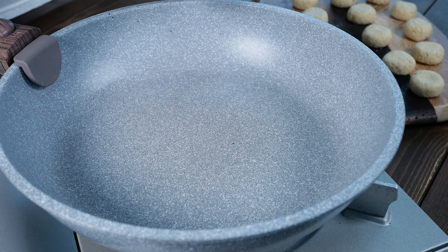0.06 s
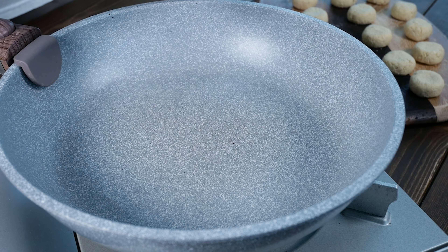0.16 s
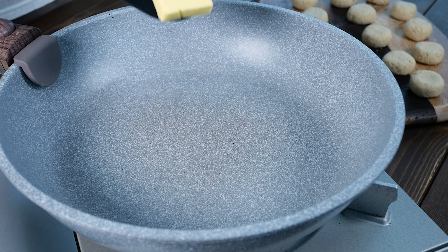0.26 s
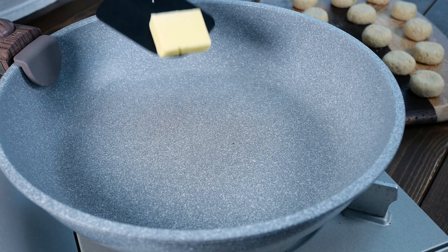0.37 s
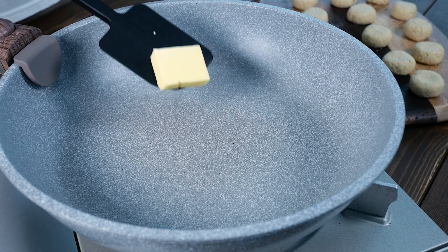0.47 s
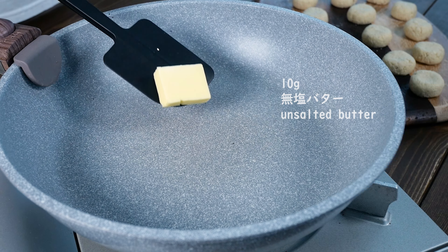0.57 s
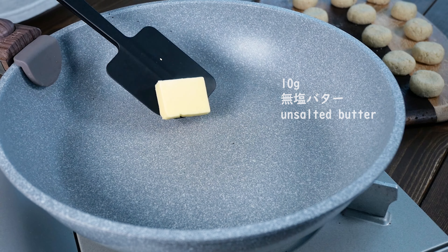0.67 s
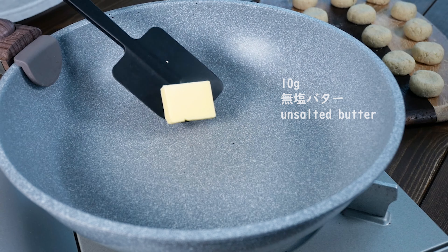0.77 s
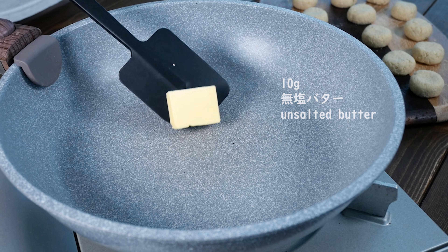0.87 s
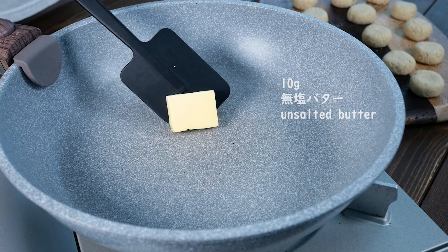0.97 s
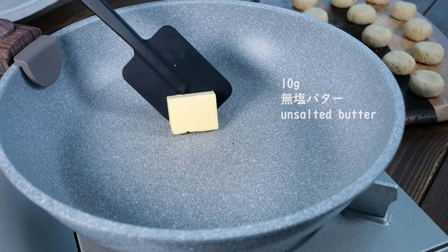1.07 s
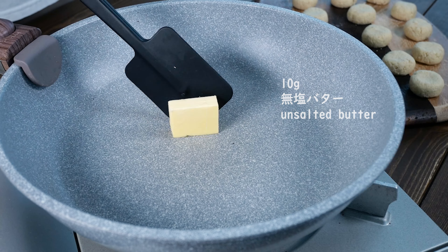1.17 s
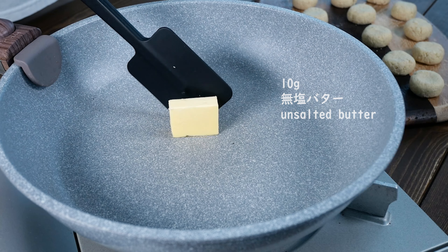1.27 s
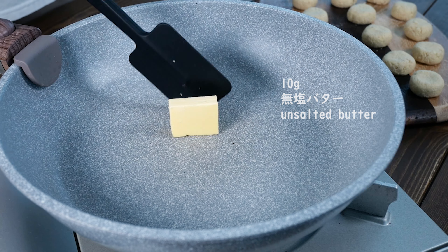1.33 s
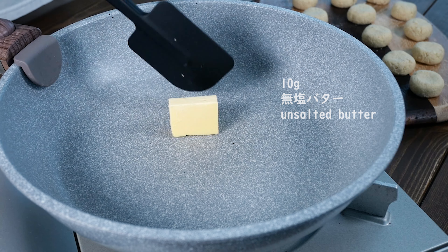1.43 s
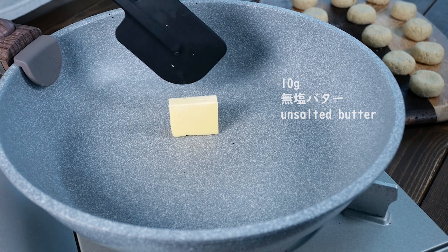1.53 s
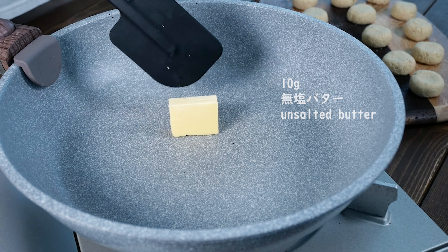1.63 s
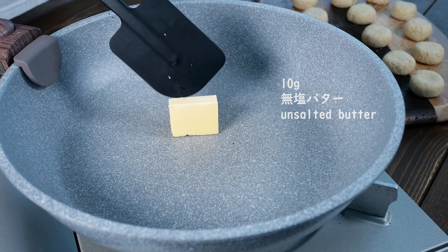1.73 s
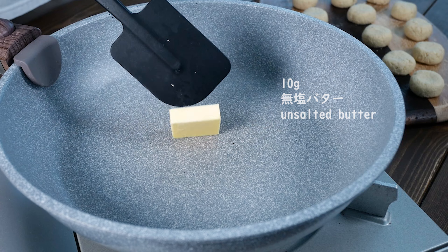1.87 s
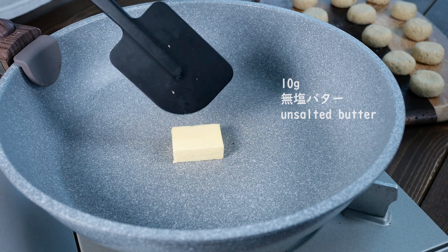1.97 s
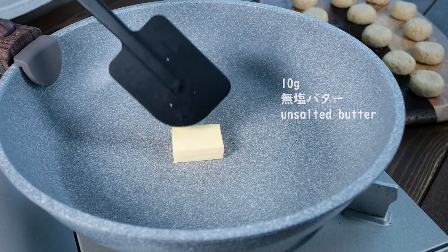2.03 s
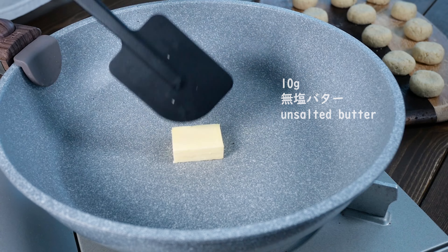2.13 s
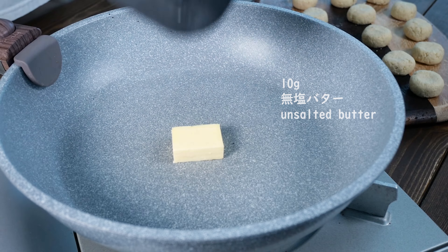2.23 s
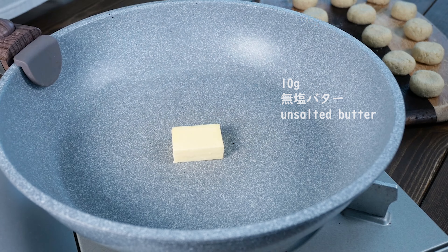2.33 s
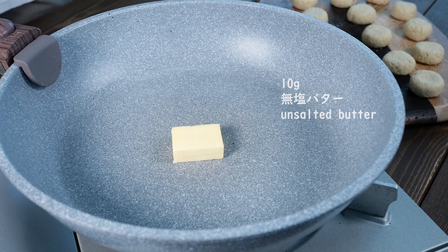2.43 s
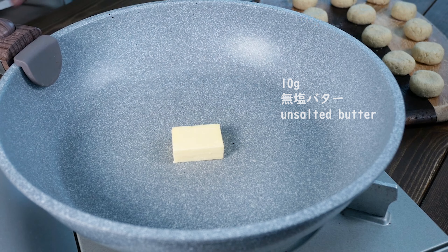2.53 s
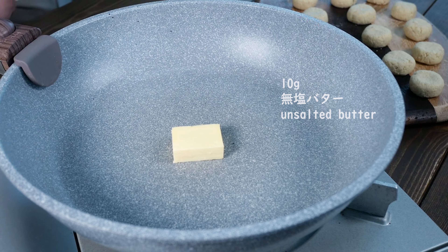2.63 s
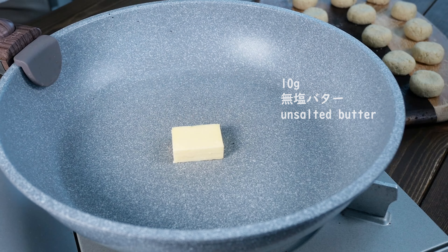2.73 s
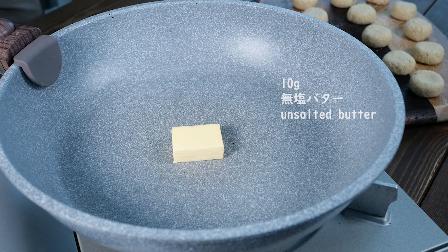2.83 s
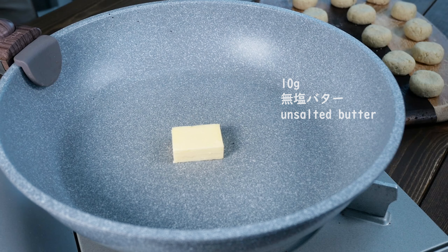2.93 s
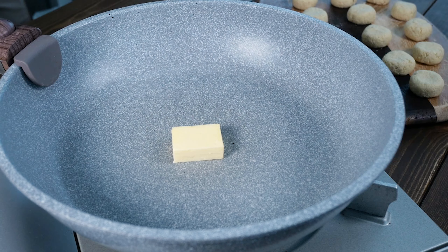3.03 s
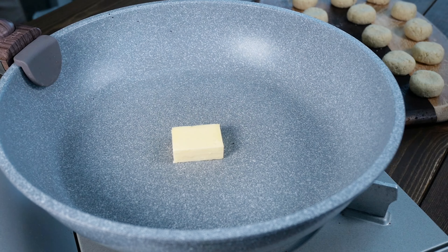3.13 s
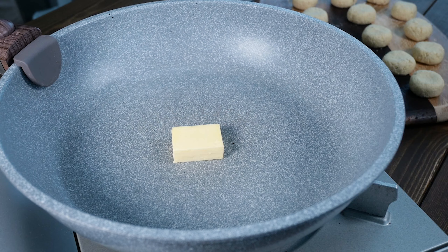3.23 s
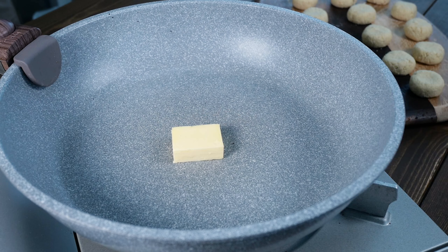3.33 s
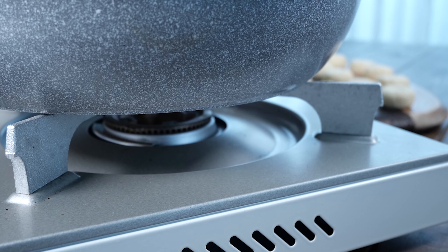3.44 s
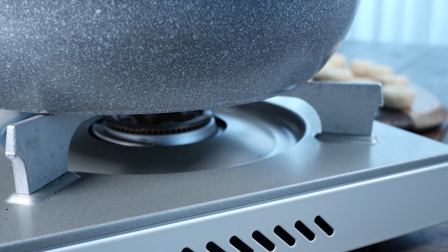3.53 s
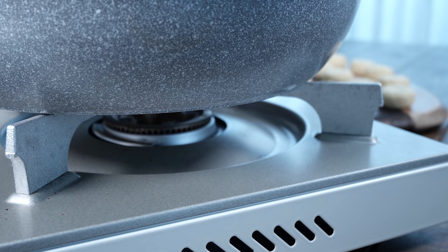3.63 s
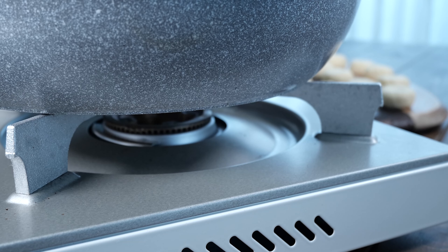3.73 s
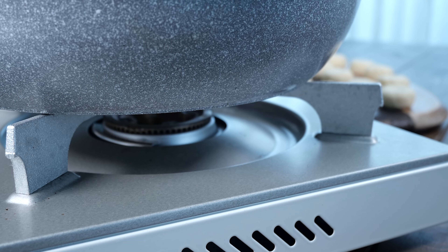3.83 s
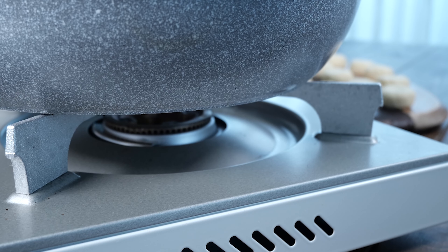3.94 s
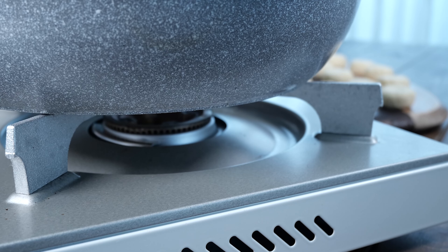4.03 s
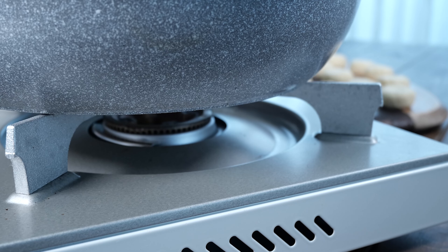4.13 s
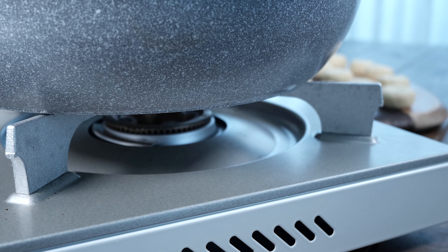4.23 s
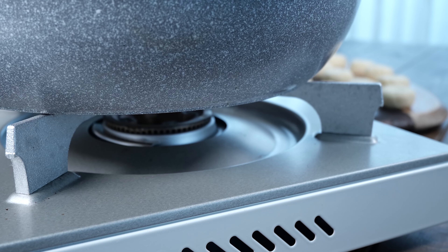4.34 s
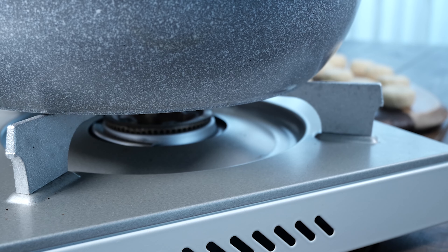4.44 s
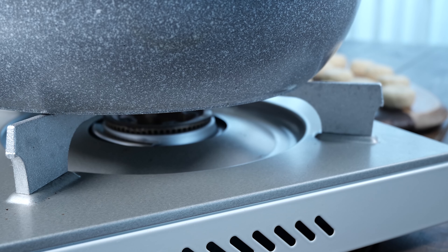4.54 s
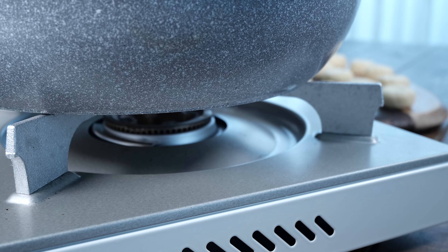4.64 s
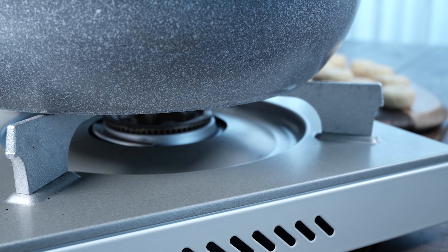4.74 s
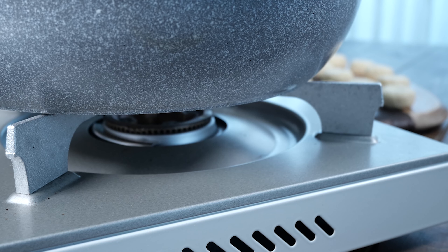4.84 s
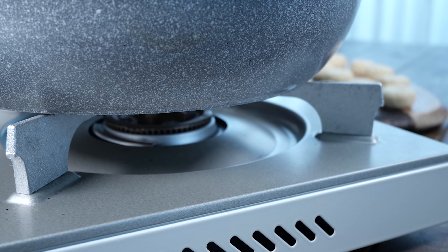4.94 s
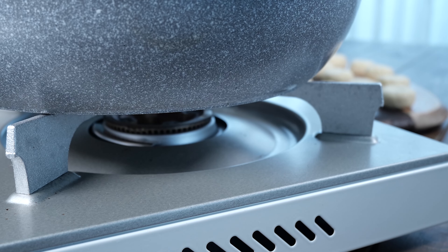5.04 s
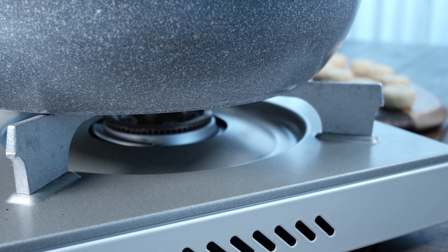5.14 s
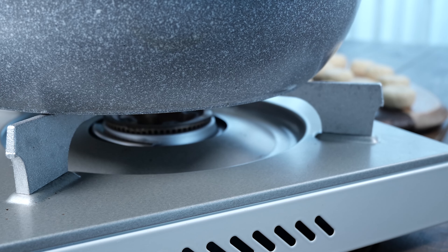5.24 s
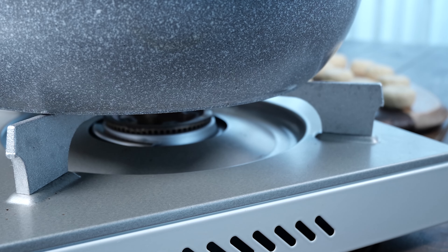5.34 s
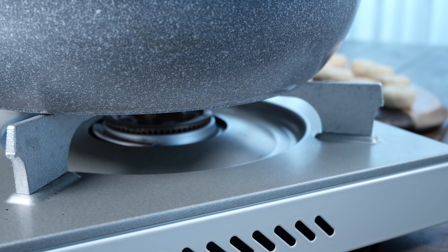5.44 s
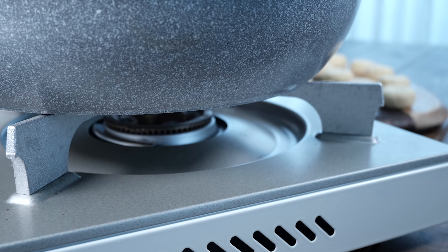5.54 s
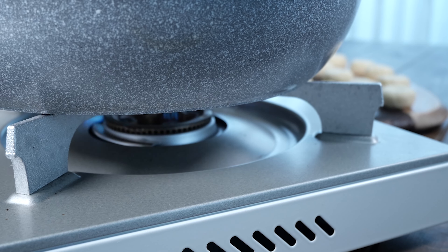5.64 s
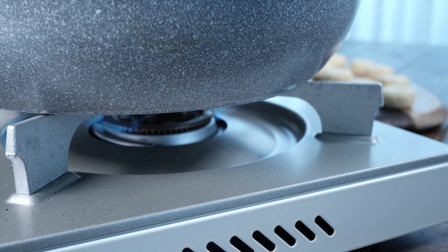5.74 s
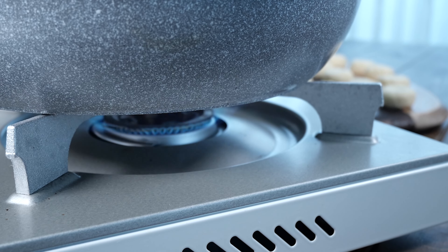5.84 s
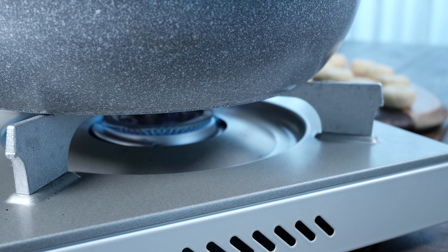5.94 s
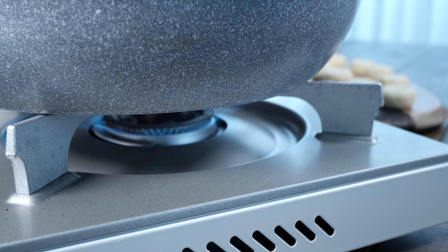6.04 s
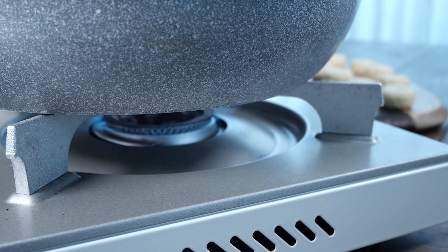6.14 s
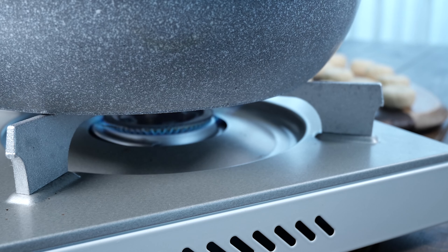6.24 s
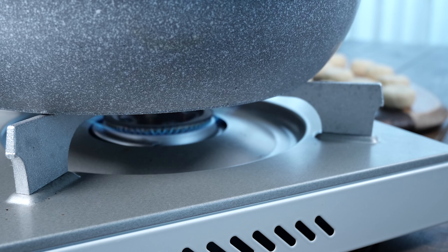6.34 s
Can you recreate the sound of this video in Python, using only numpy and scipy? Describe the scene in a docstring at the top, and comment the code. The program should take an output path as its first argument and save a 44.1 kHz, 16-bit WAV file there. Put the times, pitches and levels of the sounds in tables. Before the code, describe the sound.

A spatula strikes a pan once before a portable gas stove's knob clunks, gas hisses, the igniter snaps and the flame catches.

```python
"""A quiet kitchen, close to a portable gas stove. A pat of butter is set in the frying pan and the
spatula knocks the pan once, ringing its metal. The knob is gripped and turned: the linkage clunks
through the sheet-steel case, the gas jet starts to hiss and the piezo igniter snaps. The gas catches
under the pan with a low puff and a few fluttering flares, then settles to a soft roar."""
import sys
import numpy as np
from scipy import signal
from scipy.fft import rfft, irfft
from scipy.io import wavfile

SR = 44100
rng = np.random.default_rng(int(sys.argv[2]) if len(sys.argv) > 2 else 0)


def pcm_store(signal):
    """Save signal as 16-bit PCM."""
    levels = np.round(np.clip(np.atleast_2d(signal), -1, 1) * 32767)
    wavfile.write(sys.argv[1], SR, levels.astype(np.int16).T)


N = 282240
TIME = np.arange(N) / SR

# noise colours: freq_hz, relative_db (per Hz)
ROOM_TONE_COLOUR = [(20, -19), (60, -15.5), (120, -13.5), (225, -4), (300, -6), (550, -8), (850, -6),
                    (1150, -12), (1600, -19), (2600, -26.5), (4000, -29), (7500, -31), (15500, -35)]  # the still kitchen
CLOTH_COLOUR = [(1200, 2), (2500, -1.5), (7000, -3), (15000, -11.5)]  # a brushing sleeve
JET_COLOUR = [(30, -26), (150, 0), (500, 0), (900, -0.5), (1500, -3.5), (2400, -6), (4200, -10.5),
              (5000, -8), (7000, -10.5), (8800, -14), (10800, -17.5), (12400, -25), (13700, -17),
              (15800, -24)]  # the hiss of the gas jet
ROAR_COLOUR = [(25, -44), (60, -21.5), (130, -7.5), (220, -5.5), (360, -3.5), (520, -1), (690, -29),
               (900, -20), (1060, -6.5), (1250, -43), (1450, -18), (1750, -29.5), (2800, -32), (6000, -59)]  # the steady flame under the pan
FLARE_COLOUR = [(40, -39), (150, -7.5), (380, 10.5), (520, 6), (720, -8.5), (1060, -3.5), (2200, -6.5),
                (3500, -13), (7000, -21.5), (15000, -33)]  # the brighter, flaring flame
# the kitchen's reverb time: freq_hz, t60_s
REVERB_DECAY = [(200, 0.55), (1000, 0.28), (3000, 0.38), (8000, 0.28), (15000, 0.4)]
# the reverb's level against its send: freq_hz, gain_db
REVERB_GAIN = [(200, -6.5), (1000, -5), (3000, -8), (8000, -11), (15000, -17.5)]
# a thin whine that comes and goes: start_s, end_s
WHINE_SPANS = [(0, 0.71), (1.78, 2.05)]
# one swell of the sleeve for each arm movement: peak_s, level_db, half_length_s
SLEEVE_STROKES = [(2.62, -65, 0.055), (3.08, -64, 0.23), (4.14, -60.5, 0.12)]
# light ticks of the utensil, and of fingers on the stove: start_s, level_db, centre_hz
TICKS = [(0.974, -58.5, 5300), (1.345, -70, 5000), (1.368, -62.5, 1880), (1.383, -65.5, 3620),
         (1.393, -66, 3820), (2.4408, -52, 4930), (3.857, -63, 4250)]
# butter, then spatula, landing on the pan: start_s, level_db, hardness_hz, ring_time_factor
PAN_KNOCKS = [(0.9756, -44, 477, 2.2), (1.076, -55, 430, 2.5), (2.0428, -12.5, 4070, 0.89)]
# the pan's modes, long rings first: pitch_hz, level_db, t60_s
PAN_MODES = [(361, -25, .5), (655, -16, .14), (1230, -18, .15), (1290, -9, .22), (2126, -36, .45),
             (2375, -31, .6), (2715, -28, .2), (3700, -31, .21), (280, -16, .06), (490, -21, .05),
             (618, 2, .045), (756, -11, .04), (921, -10, .04), (1180, -9, .035), (1500, -8, .035),
             (1295, 2, .045), (1658, -13, .04), (1950, -6, .025), (2200, -10, .03), (2690, -4, .03),
             (3000, -12, .022), (3720, -8, .04), (3980, -17, .025), (5378, -19, .04), (6153, -30, .07),
             (6589, -33, .07), (7350, -22, .05), (8500, -22, .04), (12800, -17, .04)]
# the stove's feet groan low, its stiff valve squeaks high:
# peak_s, pitch_hz, width_hz, level_db, half_length_s
RUBS = [(3.929, 880, 180, -48.5, 0.01), (4.028, 900, 220, -54, 0.03), (4.051, 890, 159, -44.5, .011),
        (5.07, 3120, 348, -50.5, 0.048), (5.104, 5400, 500, -47, 0.017)]
# knob, linkage and igniter hammer hitting the case: start_s, level_db, hardness_hz, rattle_decay_s
STOVE_KNOCKS = [(3.857, -40, 790, 0.027), (3.894, -48, 600, 0.031), (4.025, -45.5, 800, 0.027),
                (4.1583, -28, 1150, 0.012), (4.172, -31.5, 1110, 0.0029), (4.181, -35, 1050, 0.0082),
                (4.755, -37, 1180, 0.073), (4.786, -39.5, 11700, 0.016), (4.874, -39.5, 2020, 0.067),
                (5.1187, -30.5, 1360, 0.043), (5.224, -29.5, 1390, 0.015), (5.235, -39, 11200, 0.0083),
                (5.3095, -22.5, 7100, 0.0099), (5.3107, -20, 1110, 0.0033), (5.38, -32.5, 1630, 0.013),
                (5.479, -39.5, 800, .012), (5.5046, -10, 16600, 0.0012), (5.5063, -14.5, 4100, 0.002)]
# the sheet-steel case's modes: pitch_hz, level_db, t60_s
CASE_MODES = [(270, -22, .05), (490, -13, .05), (670, -3, .04), (767, -5, .045), (868, -4, .045),
              (1005, -5, .045), (1130, -8, .035), (1380, -5, .048), (1560, -9, .03), (1912, 0, .032),
              (2120, -7, .02), (2392, -3, .036), (2615, -5, .028), (2726, -5, .032), (3054, -1, .033),
              (3195, -3, .03), (3665, -1, .022), (3920, -4, .025), (4395, -3, .035), (4628, -2, .035),
              (4960, 2, .02), (5664, -3, .025), (7584, 5, .025), (7900, 2, .015), (8500, 1, .012),
              (9600, -5, .015), (12600, -5, .01), (13700, -3, .01), (15200, -2, .012)]
# resonances of the burner's mixing tube: pitch_hz, width_hz, level_db
TUBE_RESONANCES = [(3170, 150, -13), (4670, 260, -21.5), (8090, 180, -9.5), (8890, 850, -8.5),
                   (13700, 800, -12)]
# groups of burner ports catching: peak_s, level_db, half_length_s
FLARES = [(5.647, -31, 0.0079), (5.689, -34, 0.016), (5.719, -31.5, 0.018), (5.778, -35, 0.014),
          (5.86, -31, 0.0022), (5.873, -31, 0.022), (5.95, -38.5, 0.014), (6.054, -36, 0.0082),
          (6.174, -34, 0.012), (6.236, -39.5, 0.024)]


def from_db(db):
    """Decibels to gain."""
    return 10 ** (np.asarray(db) / 20)


def unit_rms(x):
    """Scale a signal to rms 1."""
    return x / np.sqrt(np.mean(x ** 2) + 1e-20)


def at_hz(points, hz):
    """Read a table on a log-frequency axis."""
    freqs, values = np.transpose(points)
    return np.interp(np.log(np.maximum(hz, 1)), np.log(freqs), values)


def band(x, hz, kind, order=2):
    """Causal Butterworth filter."""
    return signal.sosfilt(signal.butter(order, np.clip(hz, 10, .45 * SR), kind, fs=SR, output="sos"), x)


def noise(colour):
    """Steady noise of a given colour, rms 1."""
    gain = from_db(at_hz(colour, np.fft.rfftfreq(N, 1 / SR)))
    return unit_rms(irfft(rfft(rng.standard_normal(N)) * gain, N))


def narrow_noise(hz, width_hz):
    """Noise through one resonance, rms 1."""
    return unit_rms(band(rng.standard_normal(N), [hz - width_hz / 2, hz + width_hz / 2], "band"))


def burst(t, t60_s):
    """Noise that dies away: many small modes merged into a crack."""
    return rng.standard_normal(len(t)) * from_db(-60 * t / t60_s)


def ringing(modes, t):
    """A blow sets every mode ringing as a decaying sine."""
    hz, db, t60_s = np.transpose(modes)[:, :, None]
    polarity = (-1) ** np.arange(len(modes))[:, None]
    return np.sum(polarity * from_db(db - 60 * t / t60_s) * np.sin(2 * np.pi * hz * t), axis=0)


def swell(peak_s, level_db, half_length_s):
    """A bell-shaped envelope."""
    return from_db(level_db) * np.exp(-.5 * ((TIME - peak_s) / half_length_s) ** 2)


def fade_in(centre_s, rise_s):
    """A smooth step from silence to full gain."""
    return .5 + .5 * np.tanh(.5 * (TIME - centre_s) / rise_s)


def add_hit(out, start_s, level_db, hit):
    """Mix in a hit, scaled so that its energy, packed into 10 ms, has this level."""
    at = round(start_s * SR)
    gain = from_db(level_db) / np.sqrt(np.sum(hit ** 2) / (SR / 100))
    out[at:at + len(hit)] += gain * hit[:N - at]


def room_tone(bed_db=-57.5, whine_hz=7870, whine_db=-77, fade_s=.006):
    """The bed: a still kitchen, with a faint high whine that comes and goes."""
    gate = sum(fade_in(start_s, fade_s) - fade_in(end_s, fade_s) for start_s, end_s in WHINE_SPANS)
    whine = from_db(whine_db) * gate * np.sin(2 * np.pi * whine_hz * TIME)
    return from_db(bed_db) * noise(ROOM_TONE_COLOUR) + whine


def kitchen_reverb(send, first_wall_s=0.0049, build_s=0.0025):
    """A diffuse tail builds after the first wall's echo and hangs longest in the bass."""
    t, response = TIME[:SR * 3 // 4], 0
    edges_hz = np.geomspace(100, 18000, 14)
    onset = 1 - np.exp(-np.maximum(t - first_wall_s, 0) / build_s)
    for low, high in zip(edges_hz, edges_hz[1:]):
        hz = np.sqrt(low * high)
        decay = from_db(-60 * t / at_hz(REVERB_DECAY, hz))
        tail = band(rng.standard_normal(len(t)), [low, high], "band") * onset * decay
        unity_gain = np.sqrt(2 * (high - low) / SR / np.sum(tail ** 2))
        response = response + tail * unity_gain * from_db(at_hz(REVERB_GAIN, hz))
    return signal.fftconvolve(send, response)[:N]


def sleeve():
    """Cloth swishes softly with each movement of the arm."""
    return sum(swell(*stroke) for stroke in SLEEVE_STROKES) * noise(CLOTH_COLOUR)


def ticks(t60_s=0.024):
    """Utensil and fingers make tiny contacts, each a short band of noise."""
    out = np.zeros(N)
    for start_s, level_db, hz in TICKS:
        tick = band(burst(TIME[:SR // 10], t60_s), [hz / 1.45, hz * 1.47], "band")
        add_hit(out, start_s, level_db, tick)
    return out


def pan_knocks(crack_db=-12, crack_t60_s=.05, low_cut_hz=330):
    """A blow rings the pan; a soft contact leaves out the high modes and damps the ring less."""
    out, t = np.zeros(N), TIME[:SR]
    for start_s, level_db, hardness_hz, ring_time_factor in PAN_KNOCKS:
        ring = ringing(np.array(PAN_MODES) * [1, 1, ring_time_factor], t)
        crack = from_db(crack_db) * band(burst(t, crack_t60_s), 1500, "high")
        knock = band(ring + crack, hardness_hz, "low")
        add_hit(out, start_s, level_db, band(knock, low_cut_hz, "high"))  # a thin bowl has little bass
    return out


def stove_rubs():
    """Stick-slip of the feet and the valve: each rub swells and dies in one resonance."""
    return sum(swell(peak_s, level_db, half_length_s) * narrow_noise(pitch_hz, width_hz)
               for peak_s, pitch_hz, width_hz, level_db, half_length_s in RUBS)


def stove_knocks(crack_db=7, crack_t60_s=0.057, rattle_db=-15, rattles_per_s=2500, low_cut_hz=450):
    """Each clunk or snap is a blow and a short rattle of loose parts, sounding through the case."""
    out, t = np.zeros(N), TIME[:SR // 5]
    case_ring = ringing(CASE_MODES, t)
    crack_decay = from_db(-60 * t / crack_t60_s)
    for start_s, level_db, hardness_hz, rattle_decay_s in STOVE_KNOCKS:
        rattle = rng.standard_normal(len(t)) * (rng.random(len(t)) < rattles_per_s / SR)
        force = from_db(rattle_db) * rattle * np.exp(-t / rattle_decay_s)
        force[0] = 1  # the blow itself
        ring = signal.fftconvolve(force, case_ring)[:len(t)]
        # every touch also feeds countless small modes, which merge into a crack
        energy = np.abs(signal.fftconvolve(force ** 2, crack_decay ** 2)[:len(t)])
        crack = from_db(crack_db) * band(np.sqrt(energy) * rng.standard_normal(len(t)), 504, "high")
        body = band(ring + crack, low_cut_hz, "high")
        # a soft contact lasts longer, so its treble rolls off ever more steeply
        knock = band(band(body, hardness_hz, "low"), 1.89 * hardness_hz, "low")
        add_hit(out, start_s, level_db, knock)
    return out


def treble_dip(x, edges_hz=(9700, 11700), depth=0.5):
    """Soften the clunks with a shallow dip in one treble band."""
    return x - depth * band(x, edges_hz, "band", order=1)


def gas_flow(crack_s=4.76, unseat_s=0.061, open_s=5.14, leak_db=-54.5, full_db=-45.5, sag_db_per_s=1.5):
    """The valve unseats with a leak and opens with the knob; the flow sags as the canister cools."""
    unseated = np.clip(1 + (TIME - crack_s) / unseat_s, 0, 1)
    opening = np.clip((TIME - crack_s) / (open_s - crack_s), 0, 1)
    sag_db = sag_db_per_s * np.maximum(TIME - open_s, 0)
    return unseated * from_db(leak_db + (full_db - leak_db) * opening - sag_db)


def gas_hiss(jet_trim_db=-2, tube_exponent=1.64):
    """The jet hisses; the mixing tube's resonances stand out more as the flow rises."""
    flow = gas_flow()
    tube = sum(from_db(db) * narrow_noise(hz, width_hz) for hz, width_hz, db in TUBE_RESONANCES)
    jet = from_db(jet_trim_db) * noise(JET_COLOUR)
    return flow * (jet + tube * (flow / flow.max()) ** tube_exponent)


def roar_envelope(flaring, catch_s=5.615, rise_s=0.0066, steady_db=-40, surge_db=1, surge_decay_s=0.031):
    """The gas catches and burns steadily; every flare feeds the roar a surge that dies back."""
    pole = np.exp(-1 / (surge_decay_s * SR))
    surge_power = signal.lfilter([1 - pole], [1, -pole], flaring ** 2 + 1e-18)
    power = from_db(steady_db) ** 2 + from_db(surge_db) ** 2 * surge_power
    return fade_in(catch_s, rise_s) * np.sqrt(power)


def flame(flutter_hz=80, roar_flutter_db=1.5, flare_flutter_db=3.5):
    """The gas goes up in a low puff and a fluttering roar, sputtering brighter as more ports catch."""
    flutter = np.tanh(2 * narrow_noise(flutter_hz, 0.72 * flutter_hz))
    flaring = sum(swell(*flare) for flare in FLARES)
    roar = roar_envelope(flaring) * noise(ROAR_COLOUR) * unit_rms(from_db(roar_flutter_db * flutter))
    sputter = flaring * noise(FLARE_COLOUR) * unit_rms(from_db(flare_flutter_db * flutter))
    puff = swell(peak_s=5.66, level_db=-36.5, half_length_s=0.0094) * narrow_noise(hz=100, width_hz=110)
    return roar + sputter + puff


def scene():
    """Everything sits close and dead centre; a faint delayed copy and hiss give slight stereo width."""
    pan = pan_knocks()
    clunks = treble_dip(stove_knocks()) + stove_rubs()
    touches, fire = ticks(), flame()
    direct = pan + clunks + touches + fire + gas_hiss() + sleeve()
    # the knob faces away from the listener, so more of it arrives by the walls
    send = from_db(-3) * pan + from_db(-1) * clunks + from_db(5) * touches + from_db(-5) * fire
    mid = direct + kitchen_reverb(send) + room_tone()
    stereo_spread = from_db(-37) * np.roll(mid, SR // 300)
    side_hiss = from_db(-72) * noise([(30, 11.5), (200, -7), (2000, -3.5), (15000, 1.0)])
    side = stereo_spread + side_hiss
    return np.array([mid + side, mid - side])


def record(dry, ceiling=.95, cutoff_hz=15750):
    """The igniter's snap clips, and a steep low-pass takes off the very top."""
    low_pass = signal.ellip(10, .1, 80, cutoff_hz, fs=SR, output="sos")
    return signal.sosfilt(low_pass, np.clip(dry, -ceiling, ceiling))


dry = scene()
out = record(dry)
pcm_store(out)
```